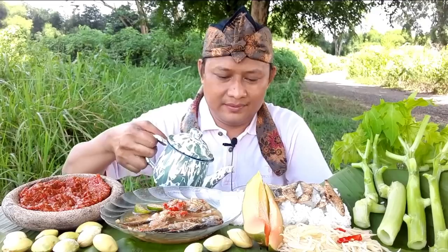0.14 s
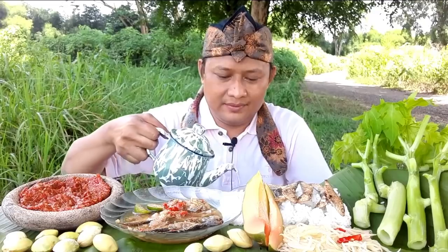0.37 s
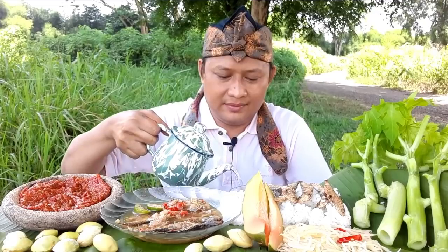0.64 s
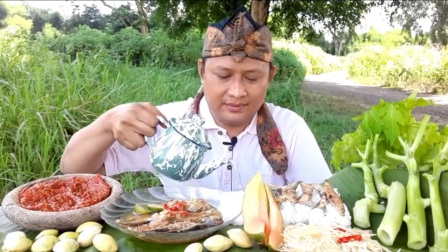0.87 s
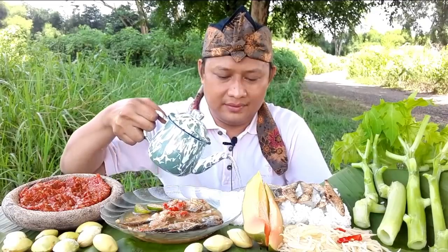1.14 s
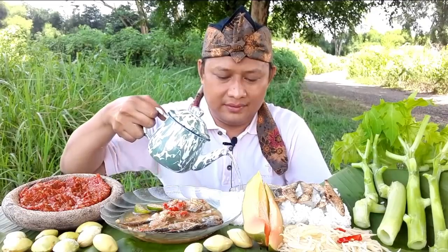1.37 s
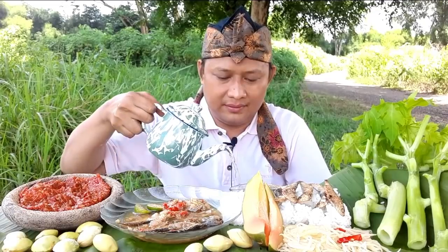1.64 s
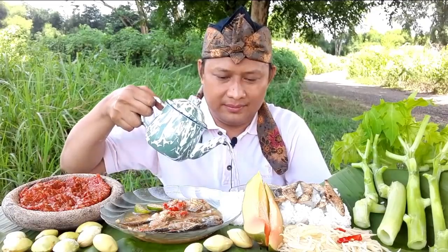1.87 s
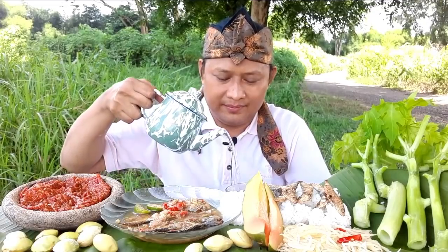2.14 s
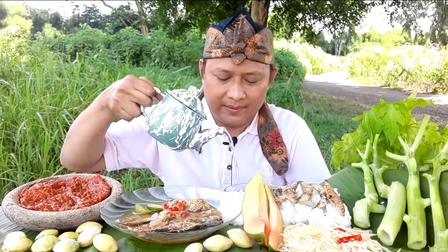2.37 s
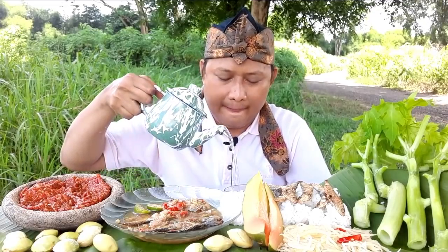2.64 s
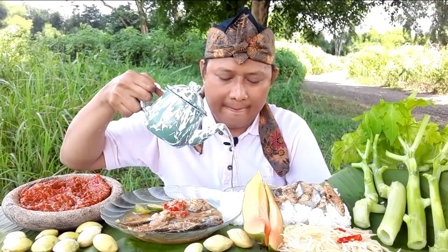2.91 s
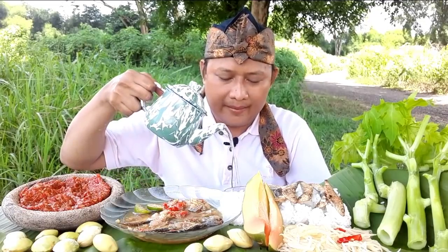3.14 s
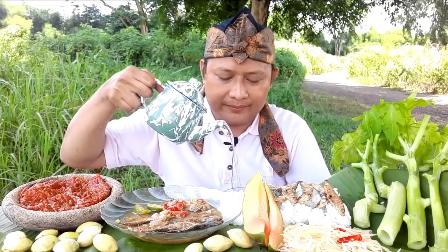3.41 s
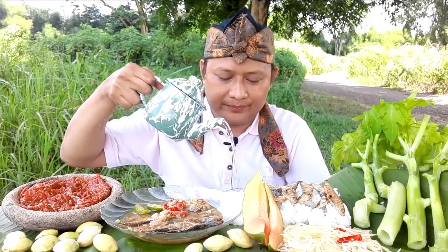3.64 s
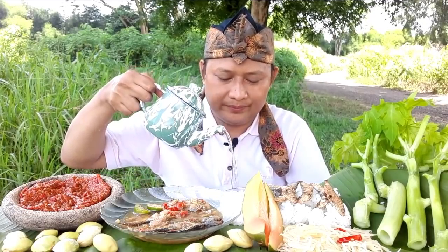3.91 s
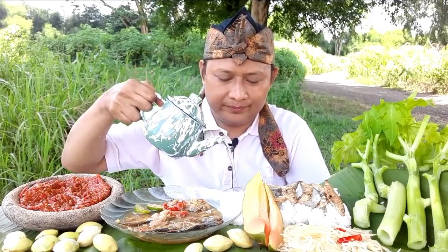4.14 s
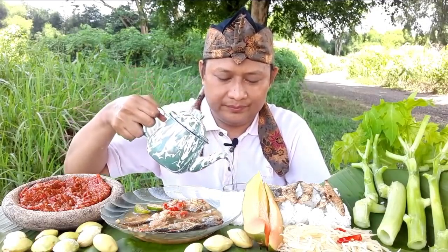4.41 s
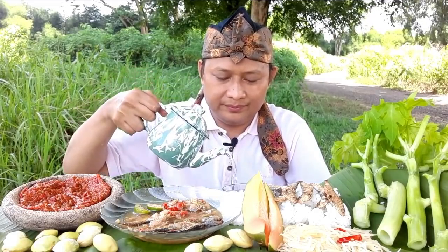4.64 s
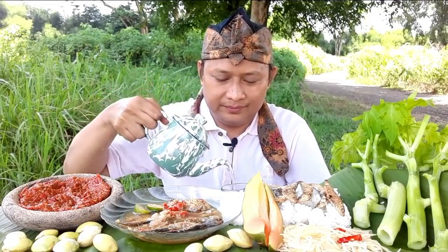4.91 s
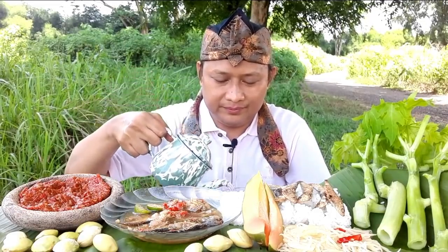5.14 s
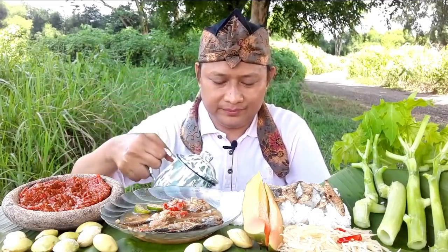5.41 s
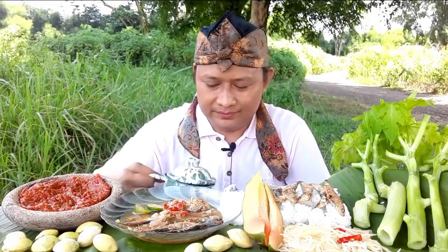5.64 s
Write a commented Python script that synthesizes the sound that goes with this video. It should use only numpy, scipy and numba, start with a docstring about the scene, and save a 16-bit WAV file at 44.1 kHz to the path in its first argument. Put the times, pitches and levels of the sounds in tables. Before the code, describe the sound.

For the first second there is only a quiet outdoor bed: low, distant traffic, soft leaf hiss and, until about 0.4 s, a barely audible far whine. Around 1 s tiny drops tick, and from 1.2 s water runs from a kettle into a glass, close and dry, with one strong plop at 1.3 s. From 1.6 to 2.1 s come lazy, hollow glugs with a low note that sinks as the glass fills. From 2.2 to 4.3 s the pour is fullest: quick chirping bubbles, dense ringing gurgle, splatter and crisp high spits, sharpest near 3.7 s, while the air resonance climbs. Traffic swells gently beneath. After 4.4 s the stream thins to high pings, a trickle and sparse drips by 5.2 s. At 5.32 and 5.36 s the enamelled metal kettle knocks hard, with cracks, bright ringing and lid rattle; lighter knocks follow at 5.39 and 5.45 s, and everything fades by about 5.8 s.

```python
"""Outdoors, far traffic and leaves murmur as shaped noise, with a faint distant whine at first.
Close to a small microphone, water runs from an enamelled kettle into a drinking glass: a swarm of
chance bubbles rings the air in the glass and the glass itself. The stream breaks into gulps: trapped
bubbles and the air in the glass ring as fading tones, with spits of filtered noise.
At the end the kettle knocks hard twice and more lightly after: ringing modes, cracks and a lid rattle."""
import sys
import numpy as np
from scipy import signal
from scipy.fft import rfft, irfft, next_fast_len
from scipy.io import wavfile
from scipy.ndimage import uniform_filter1d
from numba import njit

SR = 44100
rng = np.random.default_rng(int(sys.argv[2]) if len(sys.argv) > 2 else 0)


def log_audio(samples):
    """Write samples as a 16-bit WAV file to the path given in sys.argv[1]."""
    # one column per channel
    frames = np.atleast_2d(samples).T
    # limit to full scale, then quantise
    limited = np.clip(frames, -1, 1)
    pcm = np.round(limited * 32767).astype(np.int16)
    wavfile.write(sys.argv[1], SR, pcm)


def amplitude_ratio(level_db):
    """Convert a level in decibels to the matching linear amplitude (field) ratio."""
    exponent = np.asarray(level_db, float) / 20
    return 10 ** exponent


N = 254898  # length in samples

# Levels of close sounds are those ahead of the microphone response; T60 is the time to fall by 60 dB.

# Far traffic over time. Each row: time in seconds, level in dB.
TRAFFIC_LEVEL = [(0.0, -44.5), (0.74, -41), (3.19, -37), (3.94, -36.5), (4.99, -41.5), (5.35, -40),
                 (5.5, -46.5)]
# Colour of the far traffic. Each row: frequency in Hz, relative density in dB per Hz.
TRAFFIC_SPECTRUM = [(18, -43.5), (30, -13), (130, -1), (167, -6.5), (256, -13), (329, -19.5), (350, -23.5),
                    (377, -32), (600, -29), (780, -69.5), (1320, -120)]
# Colour of the leaves. Each row: frequency in Hz, relative density in dB per Hz.
LEAVES_SPECTRUM = [(300, -0.5), (1000, 0.5), (3000, -5.5), (4500, -11), (6000, -21), (7500, -14),
                   (8500, -8), (10000, -13), (11500, -20), (15800, -20.5)]
LEAVES_DB = -57  # mean level
# A faint far whine. Each row: time in seconds, mean level in dB.
WHINE_LEVEL = [(0, -69), (.35, -56.5), (.45, -81)]
WHINE_HZ = 982

# The stream, before it surges: flow drives gurgle and splatter, splashiness the small bubbles and spray.
# Each row: time in seconds, flow in dB, splashiness in dB.
STREAM_FLOW = [(0.95, -61.5, -63), (1.2, -35.5, -60), (1.63, -40, -60.5), (1.83, -32, -50.5),
               (2.06, -30, -57.5), (2.24, -23, -49.5), (2.39, -29.5, -43), (2.87, -27, -50),
               (3.23, -26, -46), (3.49, -30.5, -49.5), (3.73, -21, -48), (3.96, -22, -46), (4.2, -22, -52),
               (4.42, -34.5, -56), (4.7, -38.5, -59), (4.9, -46, -56), (5.29, -41, -61.5)]
# Resonance of the air in the glass: falls quickly at first, then climbs as the glass fills.
# Each row: time in seconds, pitch in Hz.
AIR_PITCH = [(1.2, 1620), (1.4, 1166), (3.5, 1380), (4.3, 1640), (5.29, 1840)]
# Small bubbles at a splashiness of -50 dB, before surging; dB gained per dB of splashiness.
SMALL_DB, SMALL_SLOPE = -43, 2.53
# The low note of the glass, before flare and surge. Each row: time in seconds, level in dB.
LOW_NOTE_LEVEL = [(1.6, -39), (1.9, -30.5), (2.9, -43.5), (3.1, -40.5), (4.05, -34), (4.45, -62)]
# It sinks as the glass fills: pitch at the first row above, pitch it tends to, time constant.
LOW_NOTE_EMPTY_HZ, LOW_NOTE_FULL_HZ, LOW_NOTE_SINK_S = 870, 356.6, 0.82
# Peak over the low note's level; dB added per dB of the bubble or ping; ring time.
THUMP_DB, THUMP_SHARE, THUMP_T60_S = 11, 0.37, .09
# Colour of the spray. Each row: frequency in Hz, relative density in dB per Hz.
SPRAY_SPECTRUM = [(1760, -18.5), (3000, 18), (4310, -23.5), (4950, -5), (6400, 3.5), (7610, 4.5),
                  (8510, 8.5), (11600, -9), (15800, -42)]
# Colour of the splatter. Each row: frequency in Hz, relative density in dB per Hz.
SPLATTER_SPECTRUM = [(250, -18), (700, -7.5), (1500, 15), (3300, -17), (5000, -20.5), (8500, -25),
                     (15000, -37)]

# Small drops, before wavering. Each row: start in seconds, peak in dB, starting pitch in Hz.
DROP_EVENTS = [(1.002, -33, 2520), (1.0239, -30, 2290), (1.1541, -29.5, 2860), (1.3623, -27, 2280),
               (2.423, -20, 3080), (2.7812, -23, 2680), (3.0292, -7.5, 2130), (3.14, -20, 2810),
               (3.4026, -19, 2350), (3.6267, -23, 2680), (3.7194, -16, 2300), (3.9753, -21, 2970),
               (4.0599, -16, 2240), (4.1518, -18.5, 2460), (3.789, -26.5, 3830), (4.105, -23, 3020),
               (4.262, -20.5, 2260), (4.305, -23, 3200), (4.842, -34, 2790)]
DROP_T60_S = 0.021
# Pings of the air above the water, before wavering. Each row: start in seconds, peak in dB, starting pitch in Hz.
PING_EVENTS = [(1.1528, -26, 1680), (1.207, -26, 1790), (1.2446, -28.5, 1520), (1.304, -30.5, 1090),
               (1.3628, -24.5, 1440), (1.372, -17.5, 1347), (1.4483, -24, 1100), (1.4893, -18.5, 1110),
               (1.755, -3, 1067), (1.8764, -21.5, 1380), (2.0167, -20, 1110), (2.2108, -7, 1200),
               (2.2646, -13, 1105), (2.3718, -12.5, 1110), (2.4168, -10, 1440), (2.4516, -6.5, 1170),
               (2.518, -19, 1320), (2.5753, -11.5, 1313), (2.6307, -9.5, 1164), (2.8166, -17.5, 1490),
               (2.87, -11, 1323), (2.9836, -11.5, 1410), (3.0302, -4.5, 1318), (3.0905, -12.5, 1314),
               (3.125, -22, 1400), (3.1476, -12, 1470), (3.166, -3, 1437), (3.2216, -11, 1330),
               (3.2605, -10, 1423), (3.3208, -4, 1303), (3.37, -16.5, 1390), (3.407, -10.5, 1295),
               (3.485, -18.5, 1300), (3.506, -15.5, 1490), (3.5516, -18.5, 1460), (3.6065, -11, 1420),
               (3.629, -15.5, 1500), (3.679, -12.5, 1370), (3.706, -12.5, 1460), (3.7173, -10, 1425),
               (3.7377, -13.5, 1526), (3.756, -11.5, 1414), (3.835, -11.5, 1495), (3.854, -5, 1410),
               (3.8794, -12.5, 1480), (3.922, -15, 1500), (3.9734, -7, 1426), (4.0525, -7, 1310),
               (4.1032, -6, 1595), (4.124, -18, 1540), (4.1922, -17.5, 1580), (4.263, -18, 1434),
               (4.2796, -9.5, 1653), (4.3095, -11.5, 1525), (4.374, -22.5, 1640), (4.5916, -16, 1616),
               (4.6214, -31.5, 1830), (4.6668, -27.5, 1620), (4.7446, -36, 1450), (4.771, -25.5, 1686),
               (4.8005, -23.5, 1630), (4.9925, -42, 2030), (5.1686, -40, 2030), (5.2042, -33, 1970)]
PING_T60_S, PING_DAMP = 0.021, 0.28  # ring of a 0 dB ping; dB of ring time lost per dB of strength
# Trapped bubbles, and near the end a few long, high pings, before wavering.
# Each row: start in seconds, peak in dB, starting pitch in Hz, T60 in seconds.
BUBBLE_EVENTS = [(1.3183, -1.5, 1010, 0.019), (1.434, -24.5, 1095, 0.072), (1.466, -18.5, 1070, 0.054),
                 (1.608, -11, 945, 0.024), (1.656, -13.5, 946, 0.067), (1.679, -14.5, 870, .1),
                 (1.7, -9.5, 833, 0.046), (1.755, -4.5, 882, 0.078), (1.816, -15, 1064, 0.042),
                 (1.817, -17.5, 650, 0.045), (1.866, -22, 615, 0.035), (1.925, -19, 780, 0.1),
                 (2.009, -15, 770, 0.031), (2.211, -13.5, 670, 0.043), (2.265, -10, 633, 0.035),
                 (2.312, -16.5, 660, 0.1), (2.371, -15.5, 765, 0.084), (2.416, -10, 559, 0.12),
                 (2.473, -12, 1023, 0.068), (2.568, -21, 650, 0.069), (2.631, -11.5, 653, 0.061),
                 (2.735, -15.5, 550, 0.018), (2.896, -21, 560, 0.044), (3.122, -15, 1160, 0.032),
                 (3.16, -10, 1100, 0.019), (3.259, -18, 1005, 0.044), (3.319, -19, 1034, .04),
                 (3.366, -16, 1120, 0.029), (3.409, -16.5, 1030, .02), (3.446, -27, 969, 0.22),
                 (3.551, -24, 857, 0.21), (3.679, -13.5, 875, .044), (3.833, -13.5, 850, 0.054),
                 (3.878, -10.5, 846, .068), (3.93, -15, 910, 0.052), (3.966, -18, 734, 0.11),
                 (3.989, -15.5, 783, 0.19), (4.058, -16.5, 995, 0.17), (4.5124, -31, 1380, 0.086),
                 (4.5326, -23.5, 1388, 0.12), (4.559, -20.5, 1474, 0.06)]
# How these move: lazy plops, then quick chirps in shallow churned water, then deeper.
# Each row: time in seconds, exponential pitch rise per second, swell in seconds.
BUBBLE_MOTION = [(1.32, 3.2, 0.0034), (1.45, 2.3, 0.0011), (1.65, 3.4, 0.0034), (2.05, 2.1, .0012),
                 (2.2, 12.7, .0008), (2.9, 21, .0007), (3.1, 4.2, .0006), (3.6, 3.3, 0.001),
                 (4.06, 3.1, .0007)]
# Spits of spray. Each row: start in seconds, peak in dB, centre in Hz.
SPIT_EVENTS = [(1.0814, -38.5, 8000), (1.231, -33.5, 6800), (1.246, -30.5, 8060), (1.693, -34, 7250),
               (2.2125, -32.5, 7800), (2.2337, -21.5, 7460), (2.302, -26, 6150), (2.3135, -19, 7900),
               (2.333, -32, 10600), (2.345, -26, 10500), (2.3719, -15.5, 7600), (2.39, -18, 9500),
               (2.4364, -15, 6060), (2.453, -19.5, 10100), (2.5047, -25, 5800), (2.568, -28, 7700),
               (2.632, -24, 5430), (2.643, -30, 9500), (2.691, -32, 8000), (2.78, -27.5, 8300),
               (2.809, -22, 6560), (2.9846, -37, 6370), (3.028, -18, 7800), (3.072, -31, 7850),
               (3.089, -29.5, 6000), (3.1247, -20.5, 9100), (3.238, -27, 10100), (3.325, -26, 8400),
               (3.378, -29, 8950), (3.4008, -16.5, 6270), (3.445, -29.5, 7160), (3.4887, -22, 9800),
               (3.5123, -18.5, 8700), (3.5907, -20, 8600), (3.677, -25, 8260), (3.7049, -18, 9000),
               (3.716, -5.5, 9100), (3.7388, -15.5, 7900), (3.7889, -22.5, 8800), (3.811, -20.5, 8200),
               (3.8584, -17, 8700), (3.895, -25, 8900), (4.074, -20, 7940), (4.797, -36, 7500)]
SPIT_CYCLES = 111  # cycles of its centre pitch until the main hiss has died by 60 dB

# Kettle knocks. Each row: start in seconds, ring in dB, crack peak in dB.
KNOCK_EVENTS = [(5.3194, -19, -1.5), (5.3587, -3, -6), (5.387, -21, -8), (5.449, -43.5, -18.5)]
# Modes of the kettle. Each row: pitch in Hz, relative level in dB, T60 in seconds.
KETTLE_MODES = [(328, -14, .12), (366, -13, .12), (760, -11, .16), (1480, -12, .14), (1741, -4, .11),
                (1888, -8, .12), (1992, -12, .12), (2246, -12, .12), (2354, -8, .16), (2700, -33, .45),
                (2835, -13, .13), (4690, -16, .15), (4936, -15, .25), (5123, -16, .14), (6207, -24, .2),
                (6995, -16, .14), (7373, -17, .18), (7553, -22, .26), (8900, -17, .09), (9290, -17, .1),
                (9616, -14, .12)]
# Colour of rattle and cracks. Each row: frequency in Hz, relative density in dB per Hz.
RATTLE_SPECTRUM = [(88, -51.5), (150, -27), (359, 4), (481, -8), (1240, -7.5), (1400, -0.5), (1910, -2),
                   (2600, -20), (2980, -3.5), (4060, -39), (4930, -22.5), (9730, -23.5), (15500, -45.5)]
# Rattle gain just after a hard knock; it settles ever faster, 60 dB down after this time.
LID_DB, LID_SETTLE_S = -15.5, 0.15

# The small microphone under cloth, for sounds close by. Each row: frequency in Hz, response in dB.
MIC_RESPONSE = [(3300, -1.5), (3800, -1), (4350, 2.5), (4700, 2), (11000, 3), (12300, -3.5), (16000, -26.5)]
# Everything fades at the end. Each row: time in seconds, gain in dB.
END_FADE = [(5.39, -0.5), (5.78, -7.5)]
TOP_HZ = 15900  # top of the recorder's range


def unit(x):
    """Scale to rms 1."""
    return x / np.sqrt(np.mean(x ** 2))


def curve(table):
    """Columns of a table after the first, as one value per sample."""
    s, *columns = np.transpose(table)
    return [np.interp(np.arange(N) / SR, s, c) for c in columns]


def colour(x, spectrum):
    """Shape a sound by (Hz, dB) points, joined on a logarithmic frequency scale."""
    hz, db = np.transpose(spectrum)
    size = next_fast_len(len(x))
    f = np.maximum(np.arange(size // 2 + 1) * SR / size, 1)
    gain = amplitude_ratio(np.interp(np.log(f), np.log(hz), db))
    return irfft(rfft(x, size) * gain, size)[:len(x)]


def colour_taps(spectrum):
    """Symmetric response with the squared spectrum, ready for a causal version."""
    pulse = np.zeros(1023)
    pulse[511] = 1
    return colour(colour(pulse, spectrum), spectrum) * np.hanning(1023)


def walk(rate):
    """Random levels, rate per second, slewed from one to the next; spread near 1."""
    k = int(SR / rate)
    held = np.repeat(rng.standard_normal(N // k + 1), k)
    return uniform_filter1d(held, k)[:N]


def trail(x, t60):
    """Strength of a sound, lingering for t60."""
    keep = 1000. ** (-1 / (t60 * SR))
    return signal.lfilter([1 - keep], [1, -keep], np.abs(x))


@njit
def band(x, hz, width):
    """Band-pass whose centre may move, gain 1 at the centre."""
    y, b, l = np.empty(len(x)), 0., 0.
    for i in range(len(x)):
        g, k = np.tan(np.pi * hz[i] / SR), width / hz[i]
        v = (b + g * (x[i] - l)) / (1 + g * (g + k))
        b, l, y[i] = 2 * v - b, l + 2 * g * v, k * v
    return y


@njit
def rings(s, gain, hz, rise, t60, swell, n):
    """Sum of fading tones that swell in while they slide up in pitch (at most an octave)."""
    out = np.zeros(n)
    for e in range(len(s)):
        i0, phase = int(s[e] * SR), 0.
        for i in range(min(int(t60[e] * SR), n - i0)):
            t = i / SR
            phase += 2 * np.pi * hz[e] * min(np.exp(rise[e] * t), 2.) / SR
            envelope = min(t / swell[e], 1.) * 1000. ** (-t / t60[e])
            out[i0 + i] += gain[e] * np.sin(phase) * envelope
    return out


def tones(s, db, hz, rise, t60, swell):
    """Fading tones whose level at the end of the swell is db."""
    columns = np.broadcast_arrays(s, db, hz, rise, t60, swell)
    s, db, hz, rise, t60, swell = (1. * c for c in columns)
    t60, swell = np.clip(t60, .003, 1), np.clip(swell, 1e-4, .01)
    return rings(s, amplitude_ratio(db + 60 * swell / t60), hz, rise, t60, swell, N)


def swarm(low_hz, high_hz, cycles, rise, spread_db, count):
    """Many unlisted bubbles of chance size, strength and moment, scaled to rms 1."""
    moment, size, strength = rng.random((count, 3)).T
    hz = low_hz * (high_hz / low_hz) ** size
    db = -spread_db * np.log(strength)
    return unit(tones(moment * (N - 1) / SR, db, hz, rise, cycles / hz, 0.00053))


def burst(t60):
    """A noise burst that starts at once and dies in t60."""
    t = np.arange(SR // 4) / SR
    return rng.standard_normal(len(t)) * 1000. ** (-t / max(t60, .002))


def add(out, s, x):
    """Mix x into out at time s."""
    i = int(s * SR)
    out[i:i + len(x)] += x[:N - i]


def outdoors():
    """In the distance traffic swells, leaves hiss almost evenly, and a thin whine sounds at first."""
    traffic = unit(colour(rng.standard_normal(N), TRAFFIC_SPECTRUM)) * amplitude_ratio(curve(TRAFFIC_LEVEL)[0])
    hiss = colour(rng.standard_normal(N), [(100, -35.0)] + LEAVES_SPECTRUM)
    leaves = unit(hiss) * amplitude_ratio(LEAVES_DB + .5 * walk(2.7))
    whine = np.sin(2 * np.pi * WHINE_HZ * np.arange(N) / SR)
    return traffic + leaves + whine * amplitude_ratio(curve(WHINE_LEVEL)[0] + 2 * walk(15))


def air_gurgle():
    """Churning bubbles excite the air in the glass; its resonance falls quickly, then climbs with filling."""
    churn = swarm(731.0, 3590.0, 36.0, 4.5, 3.23, count=5000)
    return unit(band(churn, curve(AIR_PITCH)[0], 190.0) + amplitude_ratio(-22.0) * churn)


def low_note_pitch():
    """The low note of the glass sinks exponentially as the glass fills."""
    since = np.maximum(np.arange(N) / SR - LOW_NOTE_LEVEL[0][0], 0)
    fall = np.exp(-since / LOW_NOTE_SINK_S)
    return LOW_NOTE_FULL_HZ + (LOW_NOTE_EMPTY_HZ - LOW_NOTE_FULL_HZ) * fall


def low_note(hz):
    """Short-lived low bubbles drive the sinking resonance of the glass through two bands."""
    plops = swarm(252.0, 735.0, 7.6, 0., 2.0, count=1500)
    return unit(band(band(plops, hz, 83.0), hz, 120.))


def thumps(hz, level_db):
    """Every row of the bubble table, late pings included, also thumps the low note."""
    s, db = np.transpose(BUBBLE_EVENTS)[:2]
    at = (s * SR).astype(int)
    peak_db = level_db[at] + THUMP_DB + THUMP_SHARE * db
    return tones(s, peak_db, hz[at], 1.5, THUMP_T60_S, 0.0045)


def spray():
    """Very short high bubble tones and noise fizz together."""
    fizz = swarm(4500., 14160.0, 9., 0., 3.2, count=3000) + amplitude_ratio(-1) * rng.standard_normal(N)
    return unit(colour(fizz, SPRAY_SPECTRUM))


def splatter(loud, flow_db):
    """Shaped noise follows the loud gulps; a thin trickle splatters less than a full stream."""
    noise = unit(colour(rng.standard_normal(N), SPLATTER_SPECTRUM))
    return amplitude_ratio(np.minimum(flow_db + 17, -11)) * trail(loud, 0.017) * noise


def stream(loud):
    """Churning water rings the air in the glass and the glass; splatter, small bubbles and spray fill in."""
    flow_db, splash_db = curve(STREAM_FLOW)
    low_db, low_hz = curve(LOW_NOTE_LEVEL)[0], low_note_pitch()
    t = np.arange(N) / SR
    flowing = (t > STREAM_FLOW[0][0]) & (t < STREAM_FLOW[-1][0])
    # the churn flares after every gulp and sinks until the next
    after = trail(loud, 0.13)
    flare = after / (uniform_filter1d(after, size=11000) + 0.0041)
    surge = .5 + 0.34 * flare
    small = swarm(430., 1000., 37.0, 13.0, 1.4, count=350)
    fill = air_gurgle() * amplitude_ratio(flow_db)
    fill += small * amplitude_ratio(SMALL_DB + SMALL_SLOPE * (splash_db + 50))
    fill += low_note(low_hz) * flare * amplitude_ratio(low_db)
    fill += spray() * amplitude_ratio(splash_db)
    return splatter(loud, flow_db) + thumps(low_hz, low_db) + flowing * surge * fill


def gulps():
    """Loud drops, pings and bubbles ring one by one, sliding up in pitch; their level wavers a little."""
    s, db, hz = np.transpose(DROP_EVENTS)
    drops = tones(s, db, hz, 1.8, DROP_T60_S, 0.00055)
    s, db, hz = np.transpose(PING_EVENTS)
    # weaker pings ring longer
    pings = tones(s, db, hz, 0.81, PING_T60_S * amplitude_ratio(-PING_DAMP * db), 0.0015)
    s, db, hz, t60 = np.transpose(BUBBLE_EVENTS)
    rise, swell = (c[(s * SR).astype(int)] for c in curve(BUBBLE_MOTION))
    bubbles_and_late_pings = tones(s, db, hz, rise, t60, swell)
    return (bubbles_and_late_pings + pings + drops) * amplitude_ratio(2.5 * walk(150))


def spits():
    """Each spit is a brief hiss around its centre, with a fainter tail of droplets."""
    out = np.zeros(N)
    for s, db, hz in SPIT_EVENTS:
        centre_hz = np.full(SR // 4, 1. * hz)
        hiss = burst(SPIT_CYCLES / hz) + amplitude_ratio(-15.5) * burst(0.023)
        x = band(band(hiss, centre_hz, 0.42 * hz), centre_hz, 0.42 * hz)
        add(out, s, amplitude_ratio(db) * x / np.abs(x).max())
    return out


def lid():
    """Gain of the rattle: the two hard knocks each set the lid rattling afresh."""
    t, gain = np.arange(N) / SR, np.zeros(N)
    for s, _, _ in KNOCK_EVENTS[:2]:
        settling = 1000. ** -((t - s) / LID_SETTLE_S) ** 2
        gain = np.where(t > s, amplitude_ratio(LID_DB) * settling, gain)
    return gain


def kettle():
    """Knocks crack and ring the same modes in new strengths; the lid's rattle keeps them sounding roughly."""
    hz, mode_db, t60 = np.transpose(KETTLE_MODES)
    taps = signal.minimum_phase(colour_taps(RATTLE_SPECTRUM))
    rattle = rng.standard_normal(N) * amplitude_ratio(2.3 * walk(300))
    stirred = np.zeros(N)
    for f, db, ring_s in zip(hz, mode_db, t60):
        stirred += amplitude_ratio(db) * unit(band(rattle, np.full(N, f), 6 / ring_s))
    out = (unit(signal.lfilter(taps, 1, rattle)) + amplitude_ratio(-3.5) * unit(stirred)) * lid()
    for s, ring_db, crack_db in KNOCK_EVENTS:
        strengths = ring_db + mode_db + 3 * rng.standard_normal(len(hz))
        out += tones(s, strengths, hz, 0., t60, 0.0009)
        crack = signal.lfilter(taps, 1, burst(0.03))
        add(out, s, amplitude_ratio(crack_db) * crack / np.abs(crack).max())
    return out


def scene():
    """Surroundings, water and kettle, one channel; only close sounds pass the microphone response."""
    loud = gulps()
    near = colour(loud + stream(loud) + spits() + kettle(), MIC_RESPONSE)
    return ((near + outdoors()) * amplitude_ratio(curve(END_FADE)[0]))[None]


def band_limit(x):
    """A steep low-pass at the top of the band."""
    return signal.sosfilt(signal.butter(12, 16360, fs=SR, output="sos"), x)


def record(dry):
    """The recorder thins the deepest bass, rounds the loudest peaks and cuts the top."""
    low_cut = signal.butter(2, 42, "high", fs=SR, output="sos")
    top_cut = signal.ellip(8, .2, 70, TOP_HZ, fs=SR, output="sos")
    thinned = signal.sosfilt(low_cut, dry)
    rounded = np.tanh(.8 * thinned) / .8
    mix = signal.sosfilt(top_cut, rounded)
    return band_limit(mix)


dry = scene()
out = record(dry)
log_audio(out)
```